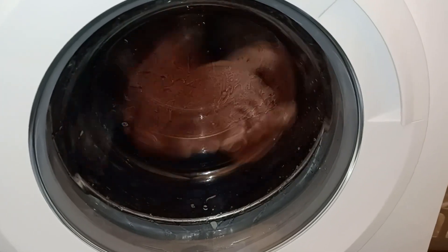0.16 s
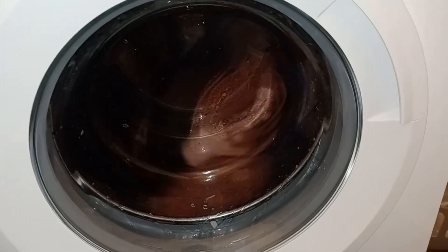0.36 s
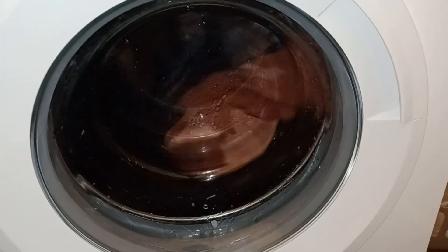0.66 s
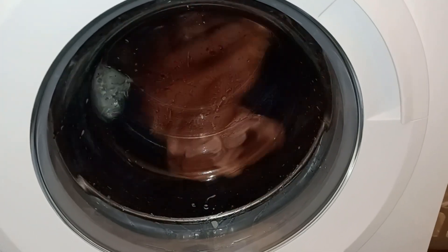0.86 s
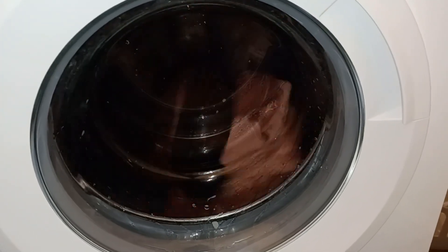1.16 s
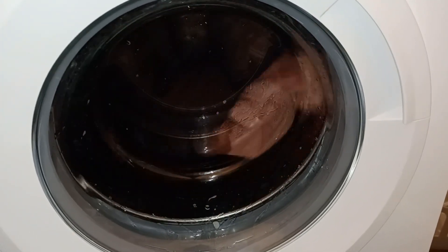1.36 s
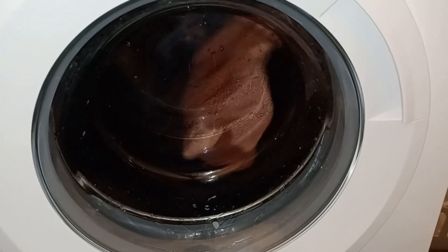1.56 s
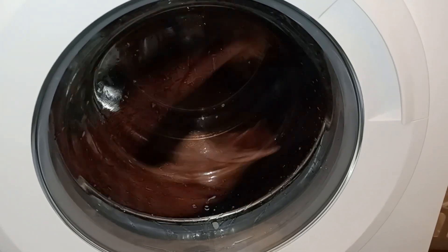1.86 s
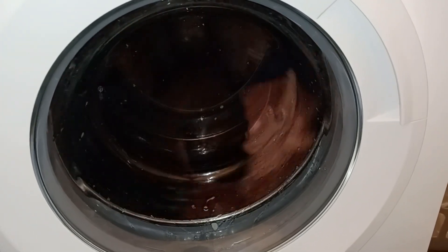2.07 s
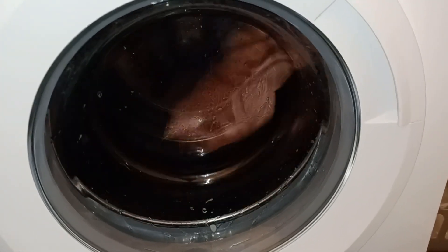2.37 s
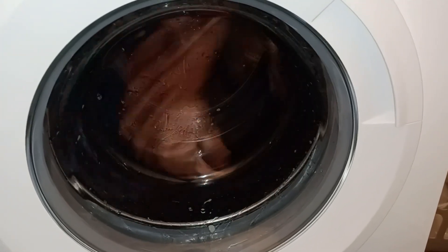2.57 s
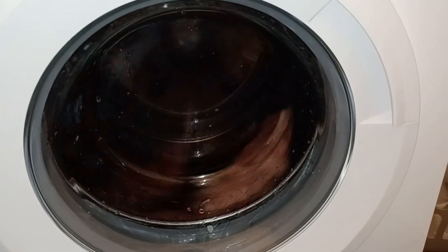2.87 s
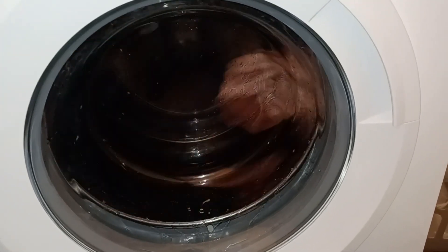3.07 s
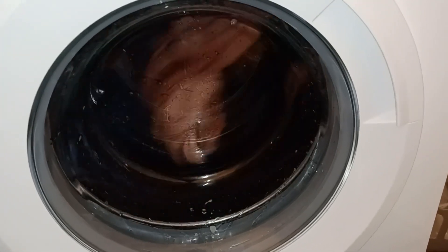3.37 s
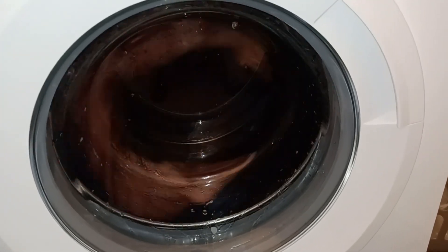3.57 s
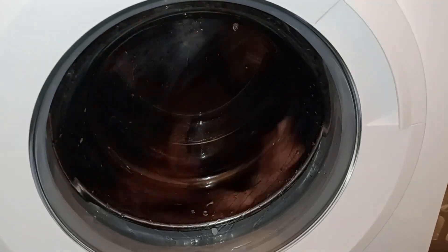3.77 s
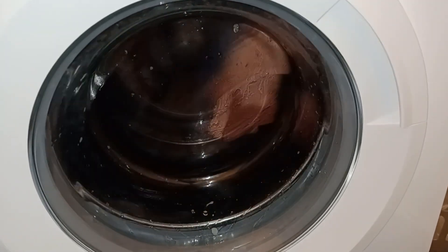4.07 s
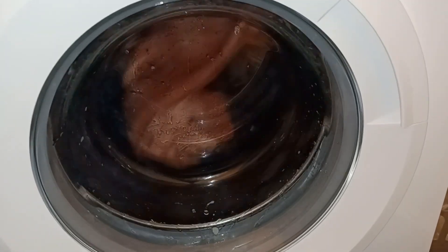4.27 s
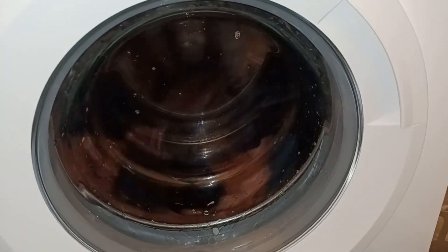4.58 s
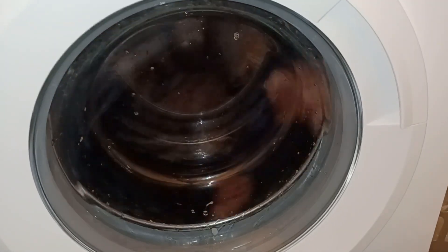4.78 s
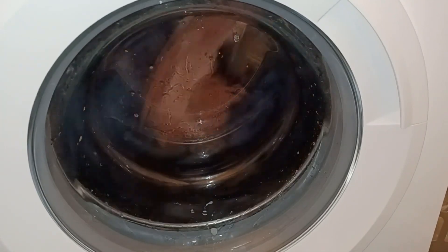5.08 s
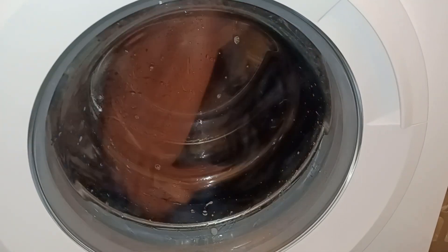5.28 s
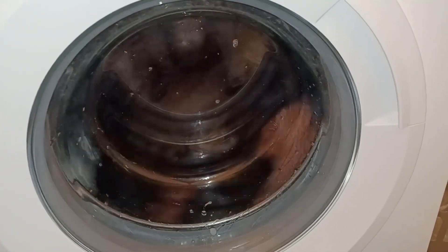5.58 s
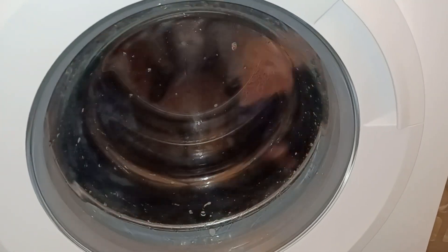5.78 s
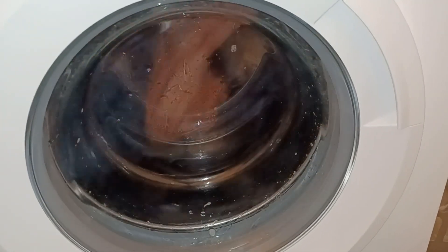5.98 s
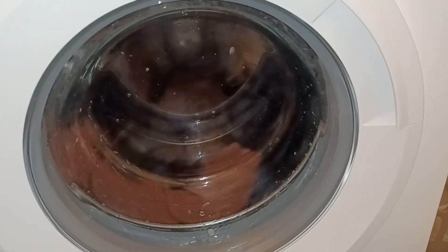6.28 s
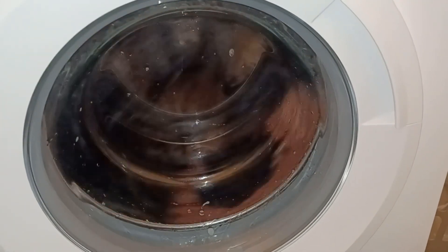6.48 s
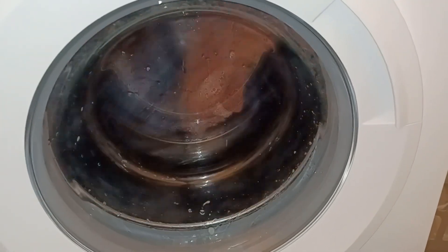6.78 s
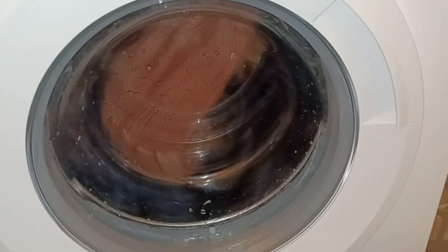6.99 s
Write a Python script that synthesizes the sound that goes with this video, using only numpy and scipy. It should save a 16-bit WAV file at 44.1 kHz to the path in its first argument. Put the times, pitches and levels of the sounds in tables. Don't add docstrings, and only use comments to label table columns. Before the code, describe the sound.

A front-loading washer tumbles a wet load close up, with dull thuds, watery sloshes, slapping cloth and zip ticks over a low motor rumble.

```python
import sys
import numpy as np
from scipy import signal
from scipy.fft import rfft, irfft, next_fast_len
from scipy.io import wavfile
from scipy.ndimage import uniform_filter1d, map_coordinates

SR = 44100
rng = np.random.default_rng(int(sys.argv[2]) if len(sys.argv) > 2 else 0)


def to_wav(sig):
    pcm = np.clip(np.atleast_2d(sig), -1, 1) * 32767
    pcm = np.round(pcm).astype(np.int16)
    wavfile.write(sys.argv[1], SR, pcm.T)


def boost(x):
    u = np.asarray(x, float) / 20
    return 10 ** u


N = 314433

# frequency in Hz, level in dB per Hz.
MOTOR_COLOUR = [(15, -46), (25, -43), (42, -42), (55, -22), (75, 4), (144, 4.5), (189, -1), (283, 2.5),
                (425, -14.5), (535, -22), (918, -26), (1400, -19.5), (1870, -20.5), (2500, -32),
                (3250, -90), (5500, -120)]
# frequency in Hz, level in dB per Hz.
HISS_COLOUR = [(1470, -36), (2500, -49.5), (2940, -68), (3480, -46), (4820, 9), (6610, 5.5), (7830, 6),
               (10200, 0.5), (12000, 6), (14000, 5), (15100, 13), (15800, 4.5)]
# start in seconds, peak level in dB, drain time in seconds.
DROPLETS = [(2.174, -58, .14), (2.204, -59.5, .3), (2.775, -64, 0.11), (3.628, -58.5, 0.19),
            (4.178, -64.5, .12), (4.458, -62, .12), (4.736, -64.5, .12), (5.345, -62, .12),
            (3.035, -67.5, 0.18), (1.257, -58, .1), (5.965, -55, 0.11), (6.41, -68, 0.11)]
# frequency in Hz, level in dB per Hz.
DROPLET_COLOUR = [(3000, -40), (3900, -6), (4970, 1), (6210, -5), (7310, -2), (8330, -4), (11700, -4),
                  (15800, -4)]
# frequency in Hz, level in dB.
RUB_MODES = [(855.9, -59), (1222, -62.5), (1416, -63.5), (1599, -68), (1782, -68), (2062, -68.5)]
# start in seconds, end in seconds.
RUB_SPAN = (5.78, 5.9)
# start in seconds, knock level in dB, knock pitch in Hz, rim ring in dB,
# ring of the hard part in dB.
ZIP_TICKS = [(0.25, -41, 1630, -60, -63), (1.3758, -46, 1750, -70, -79), (1.6317, -40, 1530, -57, -52),
             (1.7771, -37.5, 1876, -58, -68), (2.6429, -36.5, 1850, -52.5, -61),
             (4.2047, -44, 1580, -44.5, -43), (4.242, -52, 1630, -57, -65), (5.6518, -49, 1530, -86, -73),
             (5.9662, -60, 1420, -63, -45.5), (6.0743, -39.5, 1750, -52, -56),
             (6.224, -43, 1580, -64, -56.5), (6.2378, -25, 1500, -68, -71), (6.714, -51, 1380, -55, -66),
             (6.78, -43.5, 1420, -57, -77), (6.8182, -49.5, 1530, -63, -82)]
# ratio to the knock pitch, level in dB, 60 dB decay in seconds.
KNOCK_MODES = [(1.001, 6, 0.031), (1.27, -11, 0.059), (1.37, -9, 0.028)]
# frequency in Hz, level in dB, 60 dB decay in seconds.
RIM_MODES = [(2105, 2, 0.047), (2560, -6, 0.11), (2640, -4.5, 0.13), (3250, -6, 0.024), (3870, -10, .03)]
# frequency in Hz, level in dB, 60 dB decay in seconds.
ZIP_MODES = [(4800, -5, .05), (5220, -2, .08), (5600, -6, .04), (7280, -4, .05), (8750, -7, .05),
             (9240, -5, .04), (10550, -11, .04), (13300, -11, .04)]
# start in seconds, peak in dB, spray in dB, drain time in seconds.
FLOPS = [(.602, -43, -31, 0.3), (0.618, -39.5, -34, 0.23), (0.787, -31, -22, 0.1),
         (1.4526, -45, -27.5, .21), (1.485, -31, -22, 0.22), (1.69, -29.5, -22.5, 0.13),
         (1.774, -36, -13.5, 0.27), (2.311, -39, -21, 0.23), (3.196, -40.5, -16.5, 0.16),
         (3.3069, -46.5, -14.5, 0.27), (3.5045, -36.5, -22, 0.19), (3.682, -38.5, -21.5, 0.16),
         (4.128, -48.5, -20, 0.51), (4.328, -36, -24, 0.25), (4.586, -35.5, -18.5, 0.2),
         (4.8524, -49.5, -26, 0.13), (5.704, -45.5, -20, 0.34), (6.072, -34, -13, .22),
         (6.921, -44, -20.5, 0.3)]
# start in seconds, peak in dB, spray in dB, drain time in seconds.
SLAPS = [(.006, -38, -16.5, 0.28), (.7662, -43, -29, 0.13), (0.915, -33, -26, 0.19),
         (1.257, -38.5, -10.5, 0.33), (1.372, -41, -32, 0.21), (2.411, -34, -24, 0.22),
         (2.5374, -40.5, -13, 0.3), (2.551, -35.5, -25, 0.27), (2.693, -32, -29, 0.15),
         (2.7744, -47, -11, 0.2), (2.804, -40, -17, .21), (3.035, -53, -14, 0.26), (3.4, -33.5, -11, 0.26),
         (.737, -50, -28, .1), (2.088, -52.5, -28, 0.19), (3.88, -59.5, -25, 0.092),
         (6.966, -38, -18, 0.12), (4.5421, -39.5, -15, 0.19), (5.007, -44.5, -13.5, .2),
         (5.158, -45.5, -16, 0.39), (5.1966, -35.5, -12, 0.3), (5.4246, -43, -12, 0.35),
         (5.788, -39, -10, 0.24), (6.0566, -35.5, -15, 0.36), (6.2806, -36.5, -17, 0.24),
         (6.491, -48, -19, 0.28), (6.5925, -48.5, -27, 0.083), (6.69, -40.5, -9, 0.3),
         (6.943, -31, -14.5, .25)]
# start in seconds, peak in dB, spray in dB, drain time in seconds.
FLICKS = [(0.245, -40, -11, 0.3), (.418, -42, -30.5, 0.23), (.865, -38.5, -14, 0.29),
          (1.6322, -47, -10.5, 0.23), (2.204, -44.5, -20, 0.33), (2.641, -32.5, -13, 0.21),
          (3.9035, -50, -15.5, 0.36), (4.2043, -51, 4.5, 0.34), (4.247, -35.5, -19, 0.64),
          (4.7361, -56, -16, 0.2), (4.777, -43, -9.5, 0.18), (5.3448, -47, -9, 0.13),
          (5.3857, -48.5, -8.5, 0.11), (5.9454, -47, -20.5, 0.088), (5.965, -56, 4.5, .26),
          (6.237, -36.5, -15.5, 0.23), (6.725, -43.5, -20, .2), (6.778, -44, -17, 0.22)]
# time in seconds, level in dB.
POOL_LEVEL = [(0.0, -48.5), (0.42, -78), (0.79, -58), (1.11, -75), (1.65, -55.5), (1.98, -64.5),
              (2.14, -71), (2.56, -55), (2.96, -75.5), (3.53, -69.5), (3.81, -77), (4.43, -64),
              (4.91, -83.5), (6.27, -60), (6.57, -76.5), (7.13, -57)]
# frequency in Hz, level in dB per Hz.
FLOP_COLOUR = [(290, -12), (500, 3), (543, -3), (930, -7), (1100, -7.5), (1430, -24), (2420, -120)]
# frequency in Hz, level in dB per Hz.
WASH_COLOUR = [(650, -39), (1100, -4.5), (1170, -3), (1460, -1), (1850, 0.5), (2630, -12), (2890, -17),
               (3600, -24.5), (4680, -21), (7920, -120)]
# frequency in Hz, level in dB per Hz.
SPRAY_COLOUR = [(1650, -7.5), (2700, -10), (3300, -14), (3900, -5), (5290, 0), (6440, -10.5), (7180, -5.5),
                (8360, -10.5), (9110, -10.5), (9940, -15), (13000, -11.5), (14100, -19), (15100, -8),
                (15800, -41)]
# frequency in Hz, width in Hz, level in dB.
DRUM_MODES = [(749, 15, 8.5), (856, 43, 3), (1022, 49, 6), (1420, 95, 3.5), (1530, 76, 0.5), (1820, 99, 1),
              (2237, 45, 4.5), (2640, 220, 2), (5380, 500, -3.5)]
# moment of the peak in seconds, thud level in dB, time to fade 20 dB
# in seconds, hardness in dB, side panels over back panel in dB.
DROPS = [(0.466, -47, 0.64, -9.5, -5.5), (1.713, -38, 0.0848, -4, -7), (2.351, -43.5, 0.37, -19.3, 4.5),
         (2.446, -42.5, 0.25, -15, 4.5), (2.563, -32.5, 0.11, -14.0, -2.5),
         (2.815, -40.5, 0.04, -11.1, -5.4), (3.137, -57, 0.086, -6.4, -4.4), (3.218, -47.8, 0.4, -8.6, 3.3),
         (3.396, -45.0, 0.22, -11.5, 9.0), (4.855, -45.7, 0.24, -10.9, 3.3), (5.435, -40, 0.2, -13, 8),
         (6.074, -33.1, 0.11, -13, 8.5), (6.288, -31.7, 0.07, -14, 3.4), (6.978, -33.5, 0.1, -8.2, -0.6)]
# moment of the peak in seconds, thud level in dB, time to fade 20 dB
# in seconds, hardness in dB, side panels over back panel in dB.
ROLLS = [(0.032, -43.5, 0.07, -7, -0.5), (0.331, -55.4, 0.04, -11.1, 0.8), (0.645, -39, 0.08, -7.5, 0),
         (0.821, -40.8, 0.1549, -5.5, -1.9), (0.933, -41.5, 0.14, -8.5, 0.5), (1.15, -50.3, 0.13, -12, 6.5),
         (1.319, -55, 1, -13, -1.3), (1.494, -36.5, 0.15, -12.3, 6.5), (1.813, -38.3, 0.11, -11.0, 1.8),
         (1.959, -48, 0, -10.0, -3), (2.077, -50.5, 0.04, -26, 9.9), (2.221, -56, 1, -17, -0.6),
         (2.714, -42.5, 0.09, -12.0, 5.5), (2.914, -46, 0.07, -16, 0.5), (3.065, -47.4, 0.08, -14.0, -1.4),
         (3.543, -40.2, 0.23, -11, 5.5), (3.707, -43, 0.17, -12, -5), (3.988, -44.5, 0.06, -18, -5.5),
         (4.345, -29.8, 0.1378, -10, 1), (4.599, -35.5, 0.0558, -12.5, 1.2), (4.756, -59.2, 0.6, -12.5, 1),
         (5.045, -42.2, 0.06, -29.9, 6.3), (5.229, -38, 0.11, -9, -1), (5.721, -44.8, 0.03, -3, 3),
         (5.813, -47, 0.15, -11.3, -4.5), (6.515, -43.8, 0.08, -16.3, -3.5),
         (6.632, -55.5, 0.8, -12.5, 5.3), (6.787, -50, 0.04, -19.5, 14.3)]
# moment of the peak in seconds, level in dB, time to fade 20 dB in
# seconds.
SWAYS = [(.007, -49.5, 0.4), (.25, -55, .3), (.5, -54, 0.5), (.78, -47, .45), (1.1, -56, 0.5),
         (1.4, -49.5, 0.36), (1.7, -52, 0.45), (2.3, -53.5, 0.3), (2.62, -53, 0.5), (2.9, -50.5, 0.35),
         (3.4, -49.5, .3), (3.62, -54, 0.5), (3.79, -51, 0.4), (4, -48, .2), (4.2, -56, .2), (4.4, -51, .2),
         (4.8, -50, 0.3), (5.12, -53, 0.5), (5.44, -55.5, 0.5), (5.72, -57, 0), (6.05, -40, .3),
         (6.3, -52, .3), (6.55, -55, .3), (7, -47, 0.15)]
# frequency in Hz, width in Hz, level in dB.
PANEL_MODES = [(111.7, 16, -8.5), (151.8, 13, 3.5), (175.6, 33, -7), (224.9, 19.9, -1), (270.1, 21.6, 0),
               (305.6, 22.4, -3)]
# frequency in Hz, width in Hz, level in dB.
DOOR_MODES = [(361.8, 55, 3.5), (467.6, 12, 0), (507, 12, 3), (569, 34, -1), (643, 167, -5.5)]
# frequency in Hz, width in Hz, level in dB.
FRAME_MODES = [(58, 9, -10), (81, 6, 0)]
# frequency in Hz, likeness from -1 to 1.
LIKENESS = [(60, 0.95), (130, .98), (220, .94), (330, .72), (640, 0.26), (1650, 0.013), (4970, 0.026),
            (15000, -0.062)]
# frequency in Hz, left over right in dB.
LEFT_LEAN = [(60, 0), (130, 0), (250, -2.5), (600, 1.5), (1200, -3), (2400, -4.5), (4500, -3.5),
             (8000, -9.5), (11000, -8.5), (15000, -9)]

DROP_RISE, ROLL_RISE, SWAY_RISE = 0.24, 0.89, 0.59
IDLE_THUD_DB, IDLE_SWAY_DB = -63, -64.5
DOOR_DB, WET_PER_HARD = 3.5, 0.77
SPLASH_DB, SPLASH_FADE = -4.5, 0.73
MIST_DB, MIST_FOLLOWS = -71.5, 0.61
FLOP_BODY_DB, SLAP_BODY_DB, FLICK_BODY_DB = -1.5, -7.5, -14
SWELL_BEND = 1.12
BUBBLES_PER_S, BUBBLE_HZ, BUBBLE_DB = 260, 1350, -23
BUBBLE_SPREAD, BUBBLE_CYCLES = 0.272, 9.3


def unit(x):
    return x / np.sqrt(np.mean(x ** 2) + 1e-20)


def evened(x, even_s):
    width = round(even_s * SR)
    power = uniform_filter1d(uniform_filter1d(x ** 2, width), width)
    return x / np.sqrt(np.abs(power) + 1e-20)


def along(points, hz):
    f, v = np.transpose(points)
    return np.interp(np.log(hz + 1), np.log(f + 1), v)


def wobble(rate):
    coarse = np.arange(0, N + 8, 8)
    knots = rng.standard_normal(int(N * rate / SR) + 4)
    return np.interp(np.arange(N), coarse, map_coordinates(knots, [coarse * rate / SR]))


def filtered(x, response):
    m = next_fast_len(N + SR // 2)
    return irfft(rfft(x, m) * response(np.fft.rfftfreq(m, 1 / SR)), m)[..., :N]


def coloured(x, spectrum):
    return filtered(x, lambda hz: boost(along(spectrum, hz)))


def rush(patchy_db, drops_db):
    z = signal.stft(rng.standard_normal((2, N)), nperseg=512)[2]
    field = rng.standard_normal(z.shape[1:])
    field = uniform_filter1d(uniform_filter1d(field, 5, 0), 8, 1)
    pair = signal.istft(z * boost(patchy_db * unit(field)), nperseg=512)[1][:, :N]
    return unit(pair * boost(drops_db * wobble(400)))


def resonances(modes):
    def response(f):
        total = 0
        for k, (c, w, db) in enumerate(modes):
            total = total + (-1) ** k * boost(db) * 1j * f * w / (c * c - f * f + 1j * f * w)
        return total
    return response


def ring(modes, db, t):
    hz, level_db, t60 = np.transpose(modes)[:, :, None]
    strength, phase = rng.standard_normal((2, 2, len(modes), 1))
    decay = boost(db + level_db + 2.5 * strength - 60 * t / t60)
    return (decay * np.sin(2 * np.pi * hz * t + 3 * phase)).sum(1)


def swells(s, db, fade_s, rise, idle_db):
    rise = np.maximum(rise, .1)
    since = np.arange(0, N + 64, 64) / SR - s[:, None]
    fade_s = np.maximum(fade_s, .04)[:, None]
    away = np.maximum(since / fade_s, -since / (fade_s * rise[:, None]))
    each = boost(db[:, None] - 20 * away ** SWELL_BEND)
    level_db = 10 * np.log10((each ** 2).sum(0) + boost(idle_db) ** 2)
    return np.interp(np.arange(N) / 64, np.arange(len(level_db)), level_db)


def landings():
    rise = np.repeat([DROP_RISE, ROLL_RISE], [len(DROPS), len(ROLLS)])
    return (*np.transpose([*DROPS, *ROLLS]), rise)


def slap_shape(extra_db, speed, rise, bend):
    power, t = np.zeros(N + SR), np.arange(SR // 3) / SR
    for (s, db, _, drain), more_db in zip([*FLOPS, *SLAPS, *FLICKS], extra_db):
        drained_db = 60 * (t * speed / max(drain, .03)) ** bend
        shape = (1 - np.exp(-t / rise)) * boost(db + more_db - drained_db)
        start = max(round((s - rise) * SR), 0)
        power[start:][:len(t)] += shape ** 2
    return np.sqrt(power[:N])


def motor():
    bearings = rush(patchy_db=3, drops_db=0)
    drain = rush(patchy_db=.5, drops_db=0)
    rumble = unit(coloured(bearings, MOTOR_COLOUR))
    hiss = unit(coloured(drain, HISS_COLOUR))
    return boost(-57) * rumble + boost(-74.5) * hiss


def droplets():
    power, t = np.zeros(N + SR), np.arange(SR // 3) / SR
    for s, db, drain in DROPLETS:
        shape = (1 - np.exp(-t / 0.0013)) * boost(db - 40 * t / max(drain, .03))
        power[round(s * SR):][:len(t)] += shape ** 2
    return np.sqrt(power[:N]) * unit(coloured(rush(patchy_db=2.0, drops_db=2.5), DROPLET_COLOUR))


def bubbles():
    when, pitch, size, side = rng.random((1800, 4)).T
    when = np.cumsum(-np.log(when)) / BUBBLES_PER_S
    hz = BUBBLE_HZ * np.exp(BUBBLE_SPREAD * 3.42 * (pitch - .5))[:, None]
    cycles = np.arange(700) / SR * hz
    tone = np.sin(2 * np.pi * cycles * (1 + .012 * cycles))
    blip = tone * cycles * np.exp(-3.5 * cycles / BUBBLE_CYCLES) * boost(9 * size)[:, None]
    where = (np.round(when * SR).astype(int)[:, None] + np.arange(700)).ravel()
    pair = []
    for turn in (np.cos, np.sin):
        placed = blip * turn(6 * side)[:, None]
        pair.append(np.bincount(where, placed.ravel(), N)[:N])
    no_change = np.zeros(len(FLOPS) + len(SLAPS) + len(FLICKS))
    slapped = slap_shape(no_change, speed=0.91, rise=.003, bend=1.53)
    return boost(BUBBLE_DB) * slapped * unit(np.array(pair))


def rub():
    t = np.arange(N) / SR
    start, end = RUB_SPAN
    stroke = np.sin(np.pi * np.clip((t - start) / (end - start), 0, 1) ** 0.89)
    singing = np.zeros((2, N))
    for hz, db in RUB_MODES:
        unsteady = boost(db + 5 + 4 * wobble(50))
        singing += unsteady * np.sin(2 * np.pi * hz * t + rng.uniform(0, 7.2, (2, 1)))
    return stroke * singing


def zip_pull():
    out, rim = np.zeros((2, N + SR)), np.zeros((2, N + SR))
    t = np.arange(SR // 4) / SR
    for s, knock_db, knock_hz, rim_db, hard_db in ZIP_TICKS:
        wall = np.multiply(KNOCK_MODES, [knock_hz, 1, 1])
        knock = (1 - np.exp(-t / 0.0016)) * ring(wall, knock_db - 0.5, t)
        snap = boost(hard_db + 2.5 - 60 * t / 0.021) * rng.standard_normal((2, len(t)))
        chatter = np.bincount([0, *rng.integers(60, 330, size=3)], [0.82, 0.78, 0.26, 0.17])
        snaps = signal.fftconvolve(snap, chatter[None], axes=1)[:, :len(t)]
        start = round(s * SR)
        out[:, start:][:, :len(t)] += knock + snaps
        rim[:, start:][:, :len(t)] += ring(RIM_MODES, rim_db + 3.5, t) + ring(ZIP_MODES, hard_db, t)
    unsteady = boost(4 * np.array([wobble(70), wobble(70)]))
    return out[:, :N] + rim[:, :N] * unsteady


def wet_steel(spectrum):
    def response(f):
        bumps_db = sum(db / (1 + (2 * (f - c) / w) ** 2) for c, w, db in DRUM_MODES)
        return boost(along(spectrum, f) + bumps_db)
    return response


def grain(spectrum, patchy_db, drops_db):
    return evened(filtered(rush(patchy_db, drops_db), wet_steel(spectrum)), 0.038)


def water():
    s, db, fade_s, hardness_db, _, rise = landings()
    pool_s, pool_points_db = np.transpose(POOL_LEVEL)
    pool_db = np.interp(np.arange(N) / SR, pool_s, pool_points_db)
    thrown_db = db + WET_PER_HARD * hardness_db + SPLASH_DB
    splash_db = swells(s, thrown_db, fade_s * SPLASH_FADE, rise, idle_db=-99)
    wash_db = 10 * np.log10(boost(splash_db) ** 2 + boost(pool_db) ** 2)
    slosh = boost(wash_db - 3 + 2.05 * wobble(30))
    mist = boost(MIST_DB + MIST_FOLLOWS * (wash_db + 57.5) + wobble(42))

    more_spray_db = np.array([*FLOPS, *SLAPS, *FLICKS])[:, 2]
    kinds = [len(FLOPS), len(SLAPS), len(FLICKS)]
    more_flop_db = np.repeat([FLOP_BODY_DB, SLAP_BODY_DB, FLICK_BODY_DB], kinds)
    flop_slaps = slap_shape(more_flop_db - 6, speed=0.85, rise=0.0086, bend=1.8)
    wash_slaps = slap_shape(np.full(sum(kinds), -11.0), speed=1.013, rise=0.003, bend=1.535)
    spray_slaps = slap_shape(more_spray_db - 6, speed=0.74, rise=0.0021, bend=1.18)

    flop = np.hypot(boost(-1.7) * slosh, flop_slaps) * grain(FLOP_COLOUR, patchy_db=2.5, drops_db=2.5)
    wash = np.hypot(slosh, wash_slaps) * grain(WASH_COLOUR, patchy_db=2.5, drops_db=2.0)
    spray = np.hypot(mist, spray_slaps) * grain(SPRAY_COLOUR, patchy_db=2.4, drops_db=1.0)
    return flop + wash + spray


def shaken(bodies, soft_hz, even_s):
    pushes = rush(patchy_db=1.3, drops_db=2.0)
    total = 0
    for modes, force_db in bodies:
        body = resonances(modes)
        ringing = filtered(pushes, lambda f: body(f) / (1 + 1j * f / soft_hz) ** 2)
        total = total + boost(force_db) * evened(ringing, even_s)
    return total


def thuds():
    s, db, fade_s, hardness_db, sides_db, rise = landings()
    lumps_db = 1.2 * wobble(35)
    back_db = swells(s, db - 4 - sides_db / 2, fade_s, rise, IDLE_THUD_DB - 4) + lumps_db
    side_db = swells(s, db - 3.5 + sides_db / 2, fade_s, rise, IDLE_THUD_DB - 3.1) + lumps_db
    hard_db = swells(s, db + DOOR_DB + hardness_db, fade_s, rise, IDLE_THUD_DB - 2.5) + lumps_db
    sway_db = swells(*np.transpose(SWAYS), np.full(len(SWAYS), SWAY_RISE), IDLE_SWAY_DB)
    panels = shaken([(PANEL_MODES[:3], back_db), (PANEL_MODES[3:], side_db)], soft_hz=870, even_s=0.077)
    door = shaken([(DOOR_MODES, hard_db)], soft_hz=1440, even_s=0.096)
    frame = shaken([(FRAME_MODES, sway_db - .3)], soft_hz=300, even_s=0.2)
    return panels + door + frame


def heard(pair):
    def spread(hz):
        turn = np.arccos(np.clip(along(LIKENESS, hz), -1, 1)) / 2
        return np.array([np.cos(turn), np.sin(turn)])

    def lean(hz):
        return boost(np.array([[.5], [-.5]]) * along(LEFT_LEAN, hz))

    mid, side = filtered(pair, spread)
    return filtered(np.array([mid + side, mid - side]), lean)


def scene():
    background = motor() + droplets() + bubbles()
    drum = rub() + zip_pull() + water() + thuds()
    return heard(background + drum)


def low_pass(x):
    return signal.sosfilt(signal.butter(12, 15830, fs=SR, output="sos"), x)


def record(dry):
    def mic(hz):
        return (hz < 15830) * (1j * hz / (38 + 1j * hz)) ** 3

    mix = filtered(dry, mic)
    return low_pass(mix)


dry = scene()
out = record(dry)
to_wav(out)
```